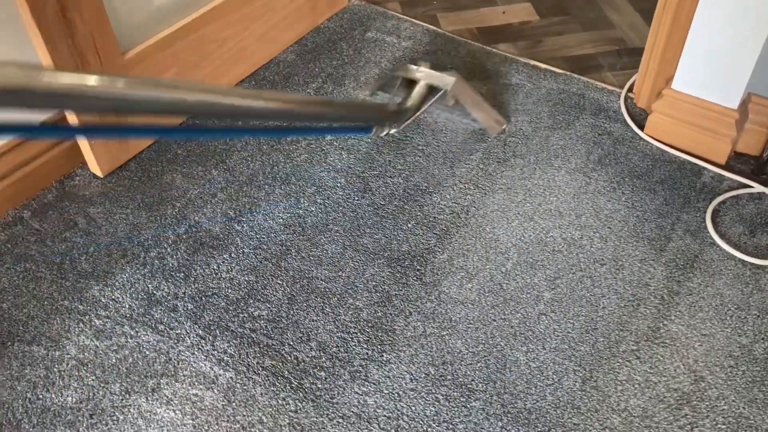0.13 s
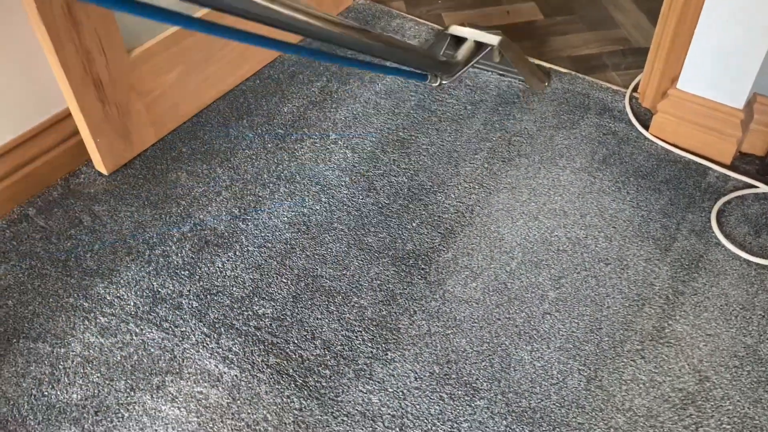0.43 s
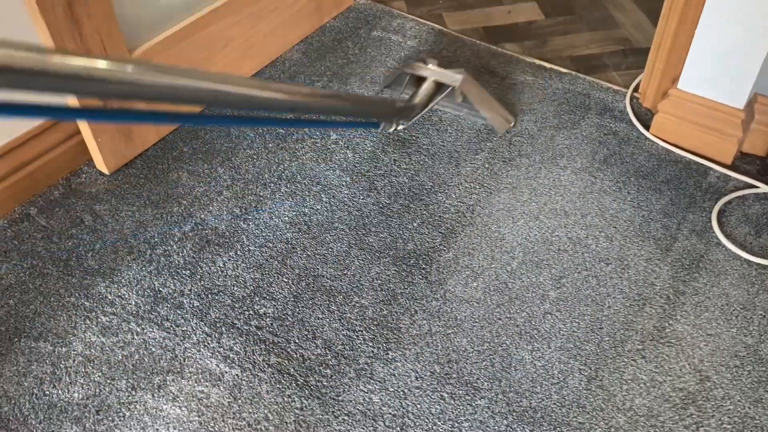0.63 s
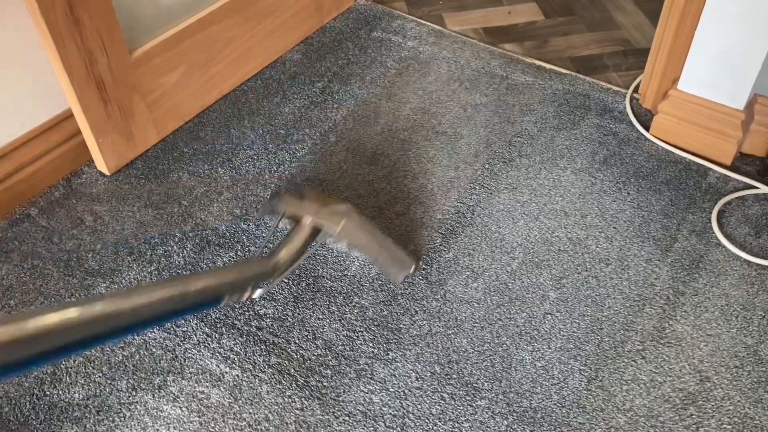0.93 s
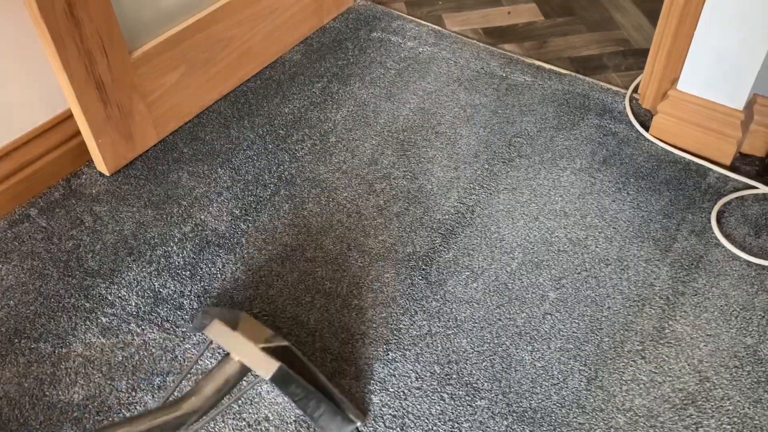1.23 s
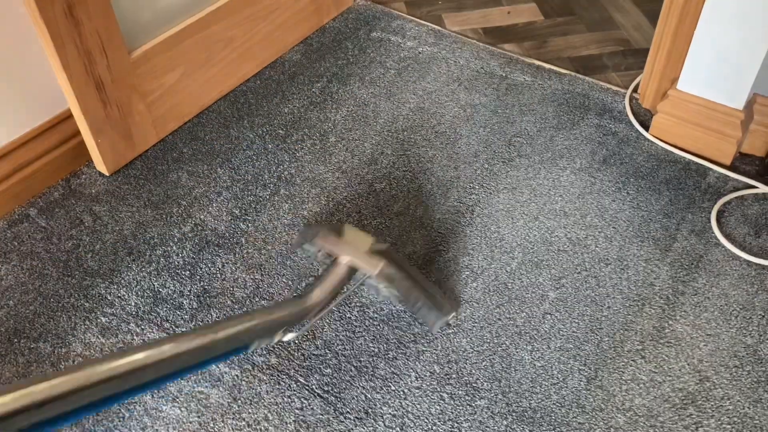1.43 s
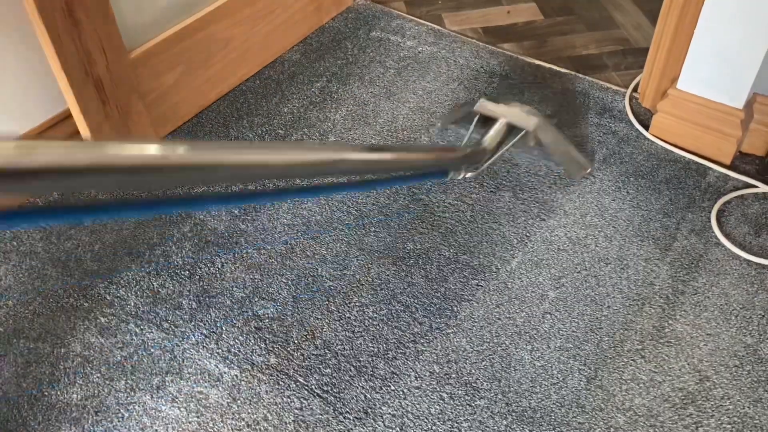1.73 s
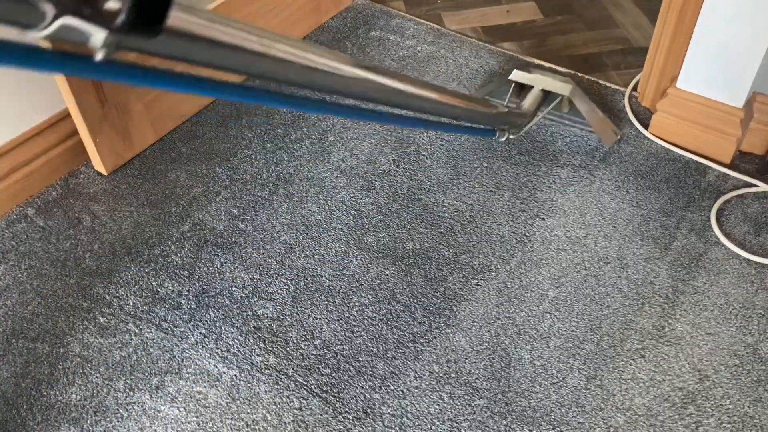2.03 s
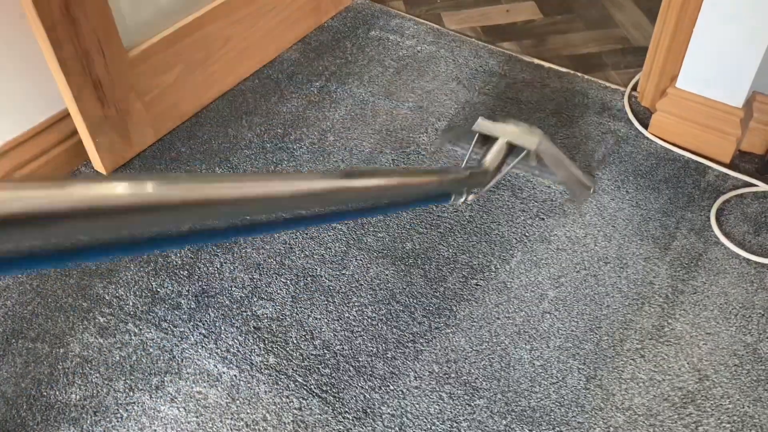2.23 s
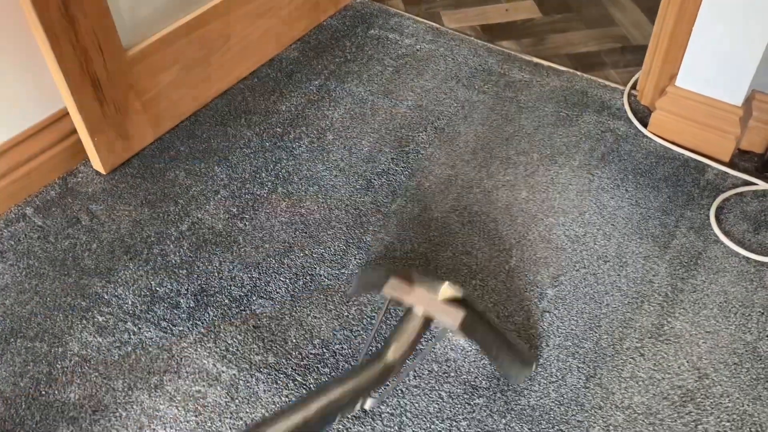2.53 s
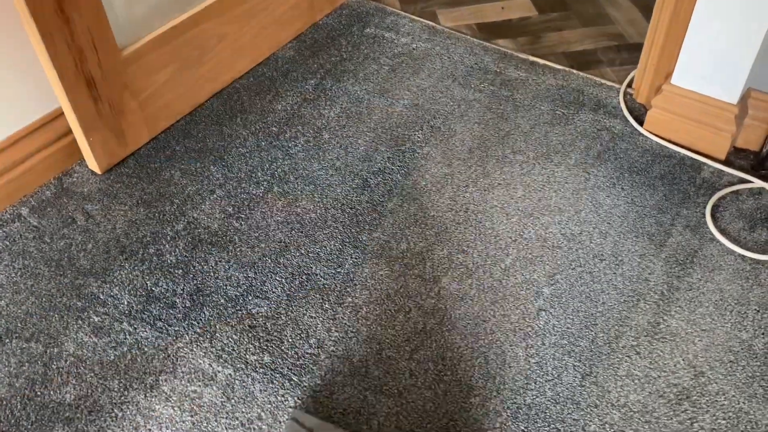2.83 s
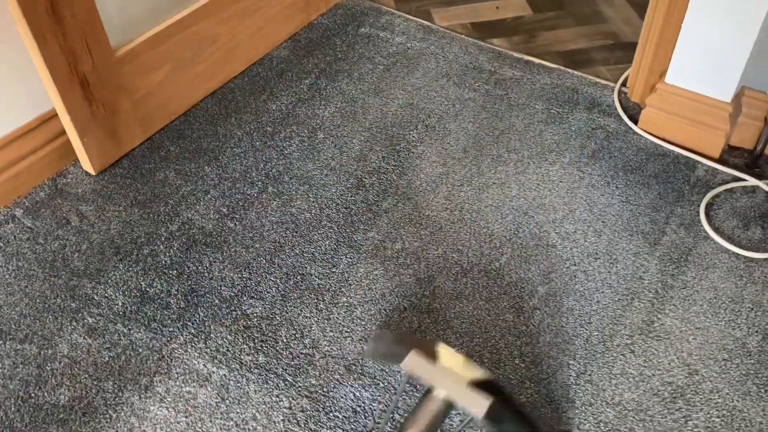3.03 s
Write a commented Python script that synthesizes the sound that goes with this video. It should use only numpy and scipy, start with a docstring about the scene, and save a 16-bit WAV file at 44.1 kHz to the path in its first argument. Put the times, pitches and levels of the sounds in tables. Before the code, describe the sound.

Steady droning, hissing suction of a carpet cleaner, with brushing strokes, scrapes and low thuds

```python
"""Carpet cleaning machine in a small room

A motor hums and whines high up and its fan whines, as tones of wandering pitch; the hose drones and hoots
and the slot hisses, sizzles and squeals, as shaped noise and tones. The head rubs and scrapes over the pile
as noise with fibre flicks, judders by stick-slip, rumbles, and thuds as damped sines where it jumps."""
import sys
import numpy as np
from scipy.fft import rfft, irfft
from scipy.io import wavfile

SR = 44100
rng = np.random.default_rng(int(sys.argv[2]) if len(sys.argv) > 2 else 0)


def dump_mix(stems):
    """Bounce the given channels to the path in sys.argv[1] as a 16-bit WAV at rate SR."""
    frames = np.atleast_2d(stems).T  # one column per channel
    limited = np.clip(frames, -1, 1)  # hard clip at full scale
    pcm = np.round(limited * 32767).astype(np.int16)
    wavfile.write(sys.argv[1], SR, pcm)


N = 141120
TIME = np.arange(N) / SR
FREQS = np.maximum(np.arange(N // 2 + 1) * SR / N, 1)

# left-right correlation of rub and scrape: (frequency [Hz], correlation [-1..1])
HEAD_LIKENESS = [(400, 1), (1000, 0.5), (2500, 0.052), (8000, .1)]
HEAD_LAG_S = 0.00015  # right after left


def from_db(db):
    """Decibels to gain."""
    return 10 ** (np.asarray(db) / 20)


def rms_one(x):
    """Scale to unit rms."""
    return x / np.sqrt(np.mean(x ** 2) + 1e-20)


def in_time(rows):
    """Interpolate a control curve at every sample."""
    return np.interp(TIME, *np.transpose(rows))


def at_hz(points):
    """Interpolate a spectrum over log frequency."""
    hz, value = np.transpose(points)
    return np.interp(np.log(FREQS), np.log(hz), value)


def running_phase(hz):
    """Integrate a frequency curve to radians."""
    return 2 * np.pi * np.cumsum(hz) / SR


def drift(rate_hz):
    """Low-passed noise of unit rms, for slow chance changes."""
    return rms_one(irfft(rfft(rng.standard_normal(N)) / (1 + (FREQS / rate_hz) ** 2), N))


def swell(centre_s, width_s):
    """Bell-shaped envelope; width is one standard deviation."""
    return np.exp(-.5 * ((TIME - centre_s) / width_s) ** 2)


def colour(pair, spectrum, peaks=(), likeness=None, lag_s=0):
    """Two unrelated excitations become one stereo sound with a spectrum and resonances; rms 1."""
    # left-right correlation by default: (frequency [Hz], correlation [-1..1])
    room_likeness = [(40, .99), (120, .96), (200, .92), (330, .72), (600, .5), (1500, 0), (4200, 0),
                     (7000, 0.26), (9000, -0.12), (10300, 0.7), (11800, -.5), (13400, .5)]
    # left minus right: (frequency [Hz], level [dB])
    balance = [(300, -1), (420, 1), (520, -4), (900, -1), (1500, 0.4), (2800, 0.1), (4200, 1), (6500, -1.5),
               (8200, -2.5), (10500, 0)]
    db = at_hz(spectrum)
    for hz, width_hz, lift_db in peaks:
        db = db + lift_db / (1 + (2 * (FREQS - hz) / width_hz) ** 2)
    alike = np.clip(at_hz(room_likeness if likeness is None else likeness), -.999, .999)
    mid, side = rfft(pair) * np.sqrt([1 + alike, 1 - alike])
    right_delay = np.exp(-2j * np.pi * FREQS * lag_s)
    ears = np.array([mid + side, (mid - side) * right_delay])
    ear_db = db + at_hz(balance) * [[.5], [-.5]]
    return rms_one(irfft(ears * from_db(ear_db), N))


def air():
    """Smooth turbulence: independent white noise in each channel."""
    return rng.standard_normal((2, N))


def air_in_room(share, count=24, echo_span_s=.02):
    """Turbulence of which a power share comes from one spot by separate reflections to each microphone."""
    source = rfft(rng.standard_normal(N))
    ears = []
    for _ in range(2):
        echoes = np.zeros(N)
        late, strength = rng.random(count), rng.standard_normal(count)
        np.add.at(echoes, (late * echo_span_s * SR).astype(int), strength * np.exp(-late))
        ears.append(rms_one(irfft(source * rfft(echoes), N)))
    return np.sqrt(share) * np.array(ears) + np.sqrt(1 - share) * air()


def flicks(spread_db):
    """Dense little clicks of carpet fibres and droplets, over smooth friction."""
    flicks_per_s, power_share = 2500, 0.68
    sizes = from_db(spread_db * np.minimum(rng.exponential(1, N), 4))
    struck = rng.random(N) < flicks_per_s / SR
    clicks = rms_one(sizes * struck * rng.choice([-1, 1], (2, N)))
    return np.sqrt(power_share) * clicks + np.sqrt(1 - power_share) * air()


def tone(phase, scatter, rate_hz, lead=0):
    """A tone whose reflections waver independently at each microphone; rms 1."""
    echoes = np.array([drift(rate_hz) + 1j * drift(rate_hz) for _ in range(2)])
    direct = np.exp(1j * lead * np.array([[.5], [-.5]]))
    return rms_one(np.real((direct + scatter * echoes) * np.exp(1j * phase)))


def motor_hum():
    """The motor shaft sounds a tone wavering in pitch and level."""
    # (time [s], level [dB])
    hum_levels = [(0, -36.5), (.17, -38.5), (.31, -48.5), (.75, -39.5), (.88, -34), (.98, -41), (1.2, -37),
                  (1.5, -34), (1.93, -39), (2.25, -38), (2.54, -30), (2.7, -39.5), (2.8, -36.5),
                  (3.02, -33), (3.2, -42)]
    # shaft rate: (time [s], frequency [Hz])
    hum_pitch = [(0, 450), (.45, 452.3), (1.4, 448.2), (2.0, 449.3), (3.2, 447)]
    wander_hz, flutter_db = 1.39, 0.87
    shaft = running_phase(in_time(hum_pitch) + wander_hz * drift(9.7))
    level_db = in_time(hum_levels) + flutter_db * drift(5.7)
    return from_db(level_db) * tone(shaft, scatter=0.19, rate_hz=8.9)


def fan_whine():
    """The fan whines, sagging under load, with an upper whine at a fixed ratio to its pitch."""
    # (time [s], level [dB])
    whine_levels = [(0, -42.5), (.12, -45.5), (.22, -39.5), (.53, -37.5), (.6, -50), (.8, -44), (1.05, -43),
                    (1.13, -51), (1.19, -41), (1.31, -39.5), (1.36, -47), (1.41, -38), (1.48, -43.5),
                    (2.12, -41.5), (2.3, -44.5), (2.45, -39.5), (2.56, -43), (2.7, -39.5), (3.0, -49),
                    (3.06, -38.5), (3.2, -42)]
    # the phase between the ears wanders as the listener moves: (time [s], left lead [rad])
    whine_lead = [(0, 3), (.12, 2.9), (.25, 1.1), (.5, 1.3), (.6, 0), (.8, 2.5), (.9, .6), (1.0, 2.8),
                  (1.05, .6), (1.15, 1.7), (1.41, 1.4), (1.55, 2.7), (1.76, 2.8), (1.9, .7), (2.1, 2.2),
                  (2.28, 1.4), (2.36, 2.5), (2.45, 1.9), (2.58, 2.8), (2.78, 2.7), (2.92, .7), (3.2, .6)]
    # (time [s], frequency [Hz])
    whine_pitch = [(0, 4090), (.5, 4091), (.9, 4065), (1.25, 4060), (1.5, 4042), (2.0, 4068), (2.5, 4040),
                   (3.2, 4022)]
    # upper whine: (time [s], level [dB])
    upper_levels = [(0, -47.5), (.9, -56), (1.4, -50), (2.1, -62), (2.7, -44.5), (3.2, -56)]
    wander_hz, upper_ratio = 4, 1.219
    fan = running_phase(in_time(whine_pitch) + wander_hz * drift(43))
    whine = from_db(in_time(whine_levels)) * tone(fan, scatter=.25, rate_hz=28, lead=in_time(whine_lead))
    upper = from_db(in_time(upper_levels)) * tone(upper_ratio * fan, scatter=0.99, rate_hz=19)
    return whine + upper


def high_whines():
    """Two faint high motor whines of warbling pitch."""
    # (frequency [Hz], level [dB])
    high_whine_rows = [(7620, -57.5), (8120, -54)]
    warbles_per_s, warble_depth_hz = 5.9, 85
    out = 0
    for hz, db in high_whine_rows:
        warble = np.sin(running_phase(warbles_per_s * (1 + 0.32 * drift(5.03))))
        phase = running_phase(hz + warble_depth_hz * warble)
        out = out + from_db(db) * tone(phase, scatter=1.9, rate_hz=30)
    return out


def hose_drone():
    """Turbulence in the hose excites its low resonances."""
    # relative density: (frequency [Hz], level [dB per Hz])
    drone_spectrum = [(10, -50), (30, -18), (60, -1), (110, 1.5), (180, -5.5), (245, -5.5), (310, -2.5),
                      (400, -5.5), (480, -6.5), (570, -8), (700, -16.5), (1200, -39), (8000, -90)]
    # resonances: (frequency [Hz], width [Hz], lift [dB])
    drone_peaks = [(204.8, 5, 11), (220.8, 22.4, 10.8), (274, 6.2, 10.2), (298.4, 14.5, 5.3),
                   (369.6, 44, 11.2), (394.6, 14.6, 4.8)]
    # (time [s], level [dB])
    drone_levels = [(0, -33.5), (.17, -33.5), (.3, -35), (.54, -32.5), (.61, -30), (.7, -30), (.8, -30),
                    (.9, -30.5), (1.2, -33), (1.65, -31), (1.95, -33), (2.5, -32), (3.05, -31), (3.2, -36)]
    return from_db(in_time(drone_levels)) * colour(air(), drone_spectrum, drone_peaks)


def nozzle_hiss():
    """Turbulence in the nozzle slot, partly echoed by the room, excites resonances."""
    # relative density: (frequency [Hz], level [dB per Hz])
    hiss_spectrum = [(300, -23), (700, -9.5), (1000, 3.5), (2000, 3.5), (2800, 0), (4200, 4.5),
                     (5000, -1.5), (5750, -4.5), (6600, -2), (7800, -5), (8800, -7), (10400, -5),
                     (11700, -17.5), (13200, -6), (14500, -18.5)]
    # resonances: (frequency [Hz], width [Hz], lift [dB])
    hiss_peaks = [(781, 27, 9.2), (1000, 14, 2.7), (1519, 39, 10.3), (1695, 9.5, 4.2), (1883, 24, 6.8),
                  (2136, 27, 6.1), (2374, 25, 10.5), (2722, 56, 4.6), (3290, 45, 8.9), (3470, 30, 2.9),
                  (3590, 35, 3.7), (4460, 35, 0.98), (4400, 18, 1.5), (4960, 65, 2.7), (7500, 150, 5.9),
                  (8056, 330, 9.4)]
    # (time [s], level [dB])
    hiss_levels = [(0, -35), (.3, -34), (.55, -34.5), (1.0, -35), (1.2, -36), (1.45, -34), (1.95, -34.5),
                   (2.2, -36), (2.8, -35), (2.95, -36), (3.2, -35)]
    level_db = in_time(hiss_levels) + .5 * drift(5)
    return from_db(level_db) * colour(air_in_room(share=0.51), hiss_spectrum, hiss_peaks)


def water_sizzle():
    """Drawn-up water sizzles as dense fine clicks with a fluttering level."""
    # (time [s], level [dB])
    sizzle_levels = [(0, -59), (.18, -51), (.29, -51), (.42, -58), (.6, -54), (3.2, -66)]
    # relative density: (frequency [Hz], level [dB per Hz])
    sizzle_spectrum = [(4000, -14), (8500, 6), (13500, 2), (15000, -12)]
    level_db = in_time(sizzle_levels) + 6.1 * drift(8.3)
    return from_db(level_db) * colour(flicks(spread_db=-3), sizzle_spectrum)


def hose_hoots():
    """Surges of air make one resonance of the hose sound for a moment."""
    # (centre [s], half-width [s], frequency [Hz], level [dB])
    hoot_rows = [(.07, .06, 210, -34), (.38, .025, 390, -33), (.612, .022, 358, -28),
                 (.885, .016, 452, -31), (1.027, .012, 465, -29.5), (1.66, .06, 217, -34),
                 (2.07, .05, 279, -34), (2.87, .05, 279, -34)]
    out = 0
    for centre_s, width_s, hz, db in hoot_rows:
        hoot = tone(2 * np.pi * hz * TIME, scatter=0.11, rate_hz=75)
        out = out + from_db(db) * swell(centre_s, width_s) * hoot
    return out


def slot_squeal():
    """The slot squeals once, falling in pitch, as the head is pushed."""
    centre_s, width_s, level_db = 1.445, .035, -45
    centre_hz, fall_hz_per_s = 3900, 1200
    glide = running_phase(centre_hz - fall_hz_per_s * (TIME - centre_s))
    return from_db(level_db) * swell(centre_s, width_s) * tone(glide, scatter=0.92, rate_hz=90)


def head_rub():
    """Friction and fibre flicks sound unevenly as the head crosses the pile."""
    # (time [s], level [dB])
    rub_levels = [(0, -42.5), (.11, -36), (.35, -51.5), (.68, -39), (.78, -41), (.9, -33), (.97, -36),
                  (1.04, -32.5), (1.09, -42.5), (1.2, -47), (1.36, -34.5), (1.47, -35.5), (1.56, -40),
                  (1.7, -37), (1.87, -58), (2.22, -48.5), (2.6, -35.5), (2.8, -57), (3.02, -36.5),
                  (3.07, -40), (3.13, -34), (3.2, -41)]
    # relative density: (frequency [Hz], level [dB per Hz])
    rub_spectrum = [(200, -27), (450, 6.5), (560, 3.5), (720, -3), (1000, 2.5), (1500, -4), (2200, -15),
                    (3500, -22.5), (7000, -37), (14000, -44)]
    level_db = in_time(rub_levels) + 1.5 * drift(28)
    rub = colour(flicks(spread_db=1.0), rub_spectrum, likeness=HEAD_LIKENESS, lag_s=HEAD_LAG_S)
    return from_db(level_db) * rub


def head_scrapes():
    """Short bursts of resonant friction where the head catches on the pile or turns."""
    # (centre [s], half-width [s], level [dB])
    catch_rows = [(.85, .01, -37), (1.015, .016, -31.5), (1.36, .008, -33.5), (1.445, .014, -36),
                  (1.535, .012, -38), (2.915, .027, -26), (3.025, .018, -37)]
    # relative density: (frequency [Hz], level [dB per Hz])
    scrape_spectrum = [(100, -30), (300, -27), (560, 8), (780, -2), (1400, 3), (2300, 2), (3000, -4.5),
                       (4300, -6), (5200, -16), (12000, -32)]
    # resonances: (frequency [Hz], width [Hz], lift [dB])
    scrape_peaks = [(974, 74, 12), (1990, 100, 6.7), (2240, 100, 7.5)]
    catches = sum(from_db(db) * swell(centre_s, width_s) for centre_s, width_s, db in catch_rows)
    friction = flicks(spread_db=4.0)
    return catches * colour(friction, scrape_spectrum, scrape_peaks, HEAD_LIKENESS, HEAD_LAG_S)


def head_judder():
    """Stick-slip: the lip catches and lets go at a wandering rate, over irregular knocking."""
    # (time [s], level [dB])
    judder_levels = [(0, -34), (.05, -26), (.09, -27.5), (.17, -29.5), (.25, -35.5), (.5, -42.5), (.8, -40),
                     (1.15, -39), (1.4, -34.5), (1.6, -27), (1.7, -30.5), (1.755, -30), (1.79, -40),
                     (2.1, -54), (2.4, -35.5), (2.55, -45), (2.87, -44), (2.96, -31), (3.2, -31.5)]
    # irregular knocking, relative density: (frequency [Hz], level [dB per Hz])
    judder_spectrum = [(15, -45), (30, -51), (60, -6.5), (85, 0.5), (100, -3), (120, -9.5), (160, -7.5),
                       (300, -27.5), (1000, -68), (8000, -120)]
    rate_hz, wander_hz, regular_power_share = 94, 12.1, 0.17
    phase = running_phase(rate_hz + wander_hz * drift(24.0))
    regular = np.sqrt(2 * regular_power_share) * np.sin(phase)
    knocking = np.sqrt(1 - regular_power_share) * colour(air(), judder_spectrum)
    return from_db(in_time(judder_levels)) * (regular + knocking)


def head_bumps():
    """Where the head jumps, the floor answers with a short damped thud."""
    # (start [s], frequency [Hz], level before attack and decay [dB])
    bump_rows = [(.04, 105, -22), (.165, 95, -22), (1.24, 48, -21), (1.578, 98, -19.5), (1.652, 85, -20),
                 (1.73, 92, -19)]
    t60_s, attack_s = .24, .005
    out = 0
    for start_s, hz, db in bump_rows:
        age_s = np.maximum(TIME - start_s, 0)
        envelope = from_db(db - 60 * age_s / t60_s) * (1 - np.exp(-age_s / attack_s))
        out = out + envelope * np.sin(2 * np.pi * hz * age_s)
    return out


def wand_rumble():
    """The moving wand shakes the floor: deep shaped noise."""
    # (time [s], level [dB])
    rumble_levels = [(0, -43), (.6, -46.5), (1.17, -42), (1.255, -25.5), (1.4, -38.5), (1.7, -42),
                     (1.95, -66), (2.08, -46), (2.15, -35), (2.25, -39.5), (2.55, -46), (2.7, -43),
                     (2.79, -35), (2.87, -46), (2.95, -37), (3.2, -35)]
    # relative density: (frequency [Hz], level [dB per Hz])
    rumble_spectrum = [(5, -50), (15, -28), (28, -8), (42, 11), (55, 4.5), (75, -5), (130, -39), (600, -70),
                       (8000, -120)]
    return from_db(in_time(rumble_levels)) * colour(air(), rumble_spectrum)


def scene():
    """Sum machine, airflow and wand."""
    machine = motor_hum() + fan_whine() + high_whines()
    airflow = hose_drone() + nozzle_hiss() + water_sizzle() + hose_hoots() + slot_squeal()
    wand = head_rub() + head_scrapes() + head_judder() + head_bumps() + wand_rumble()
    return machine + airflow + wand


def record(dry):
    """Cut the top steeply, 3 dB down at the cutoff."""
    cutoff_hz = 14600
    return irfft(rfft(dry) / np.sqrt(1 + (FREQS / cutoff_hz) ** 200), N)


dry = scene()
out = record(dry)
dump_mix(out)
```